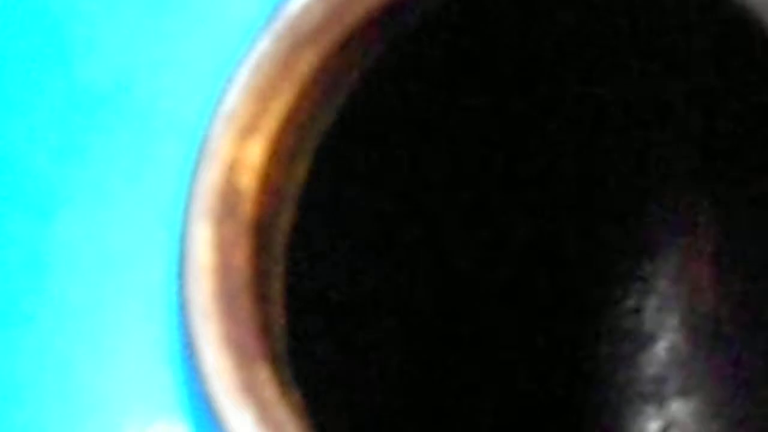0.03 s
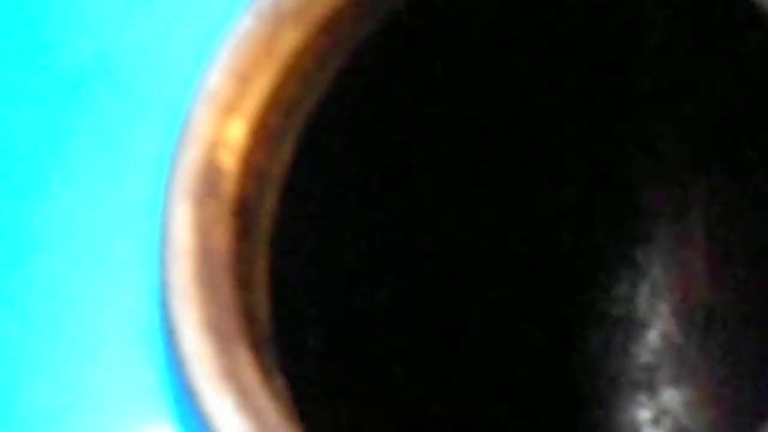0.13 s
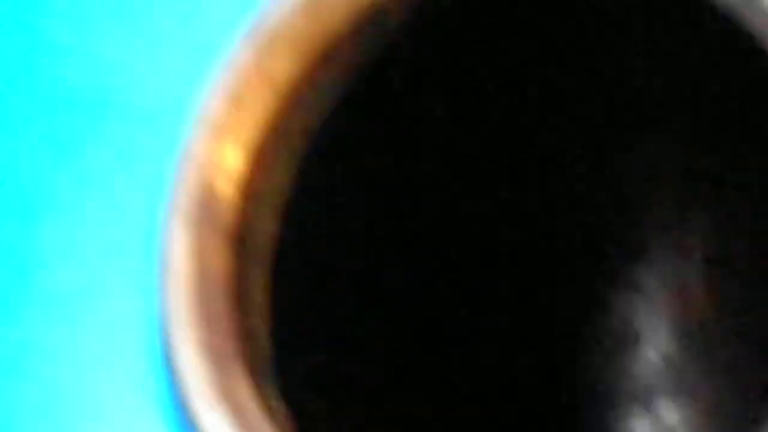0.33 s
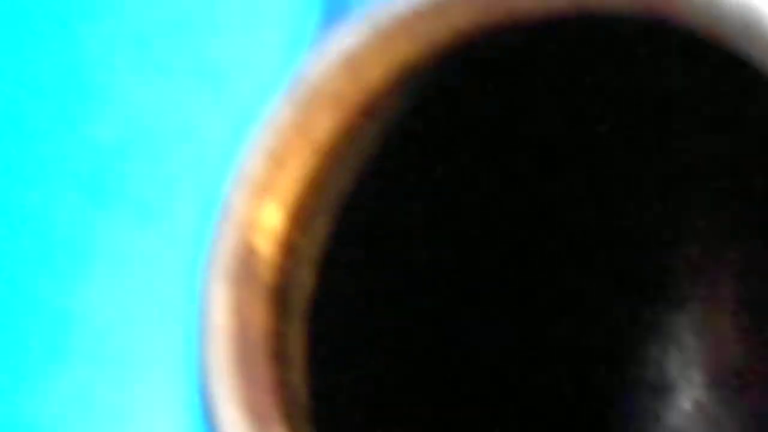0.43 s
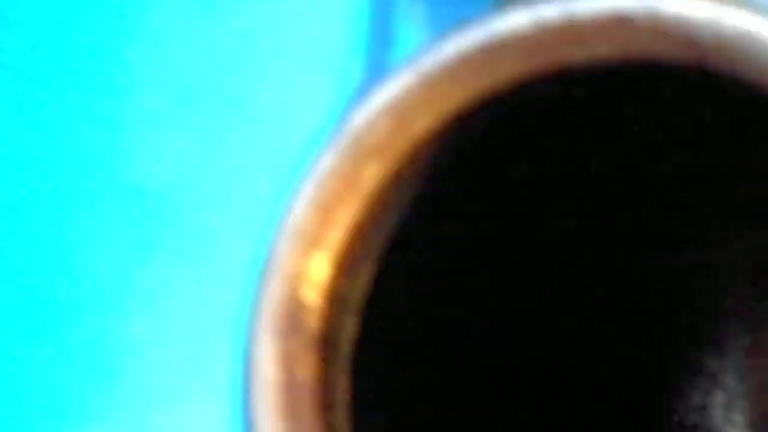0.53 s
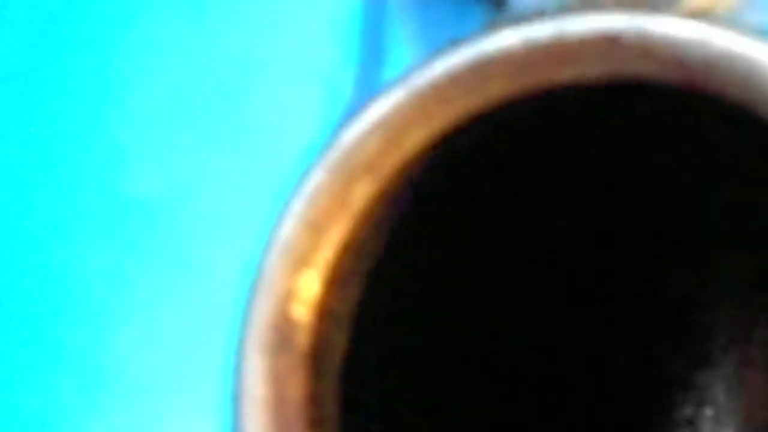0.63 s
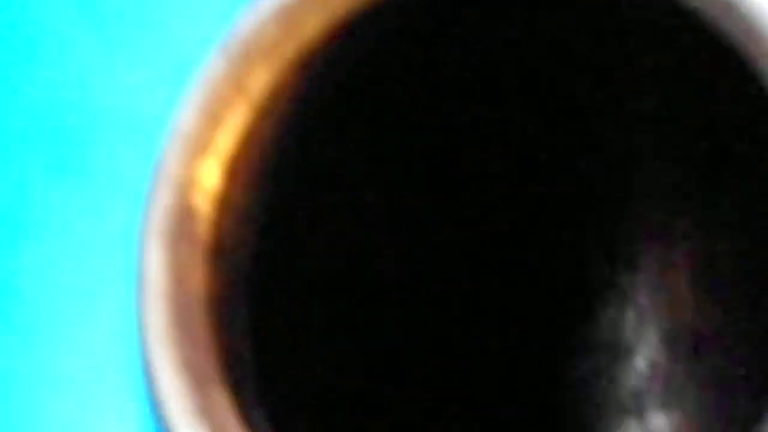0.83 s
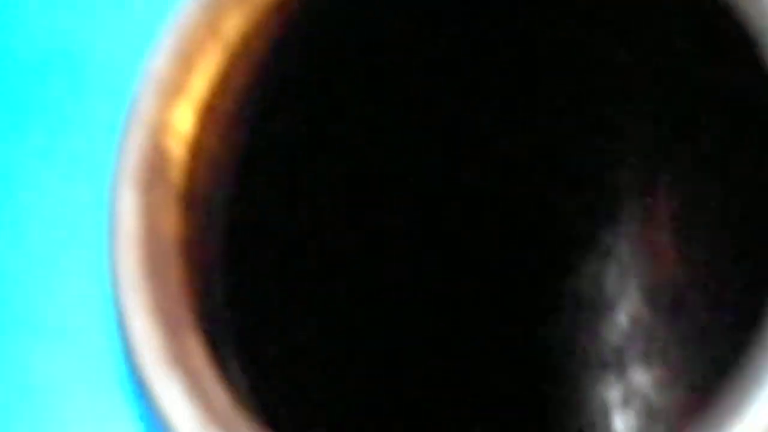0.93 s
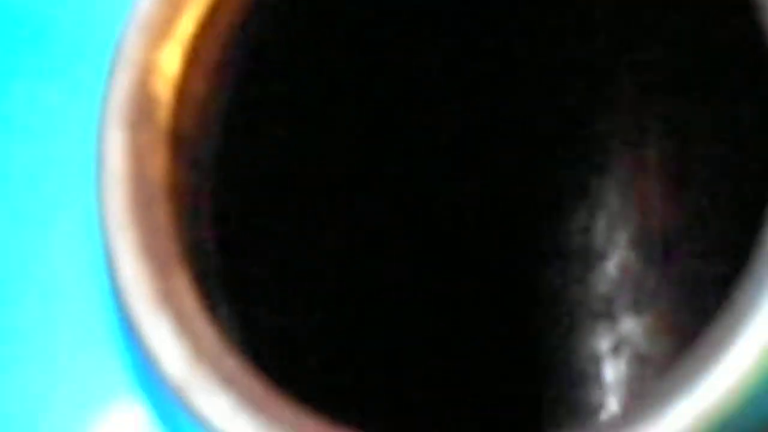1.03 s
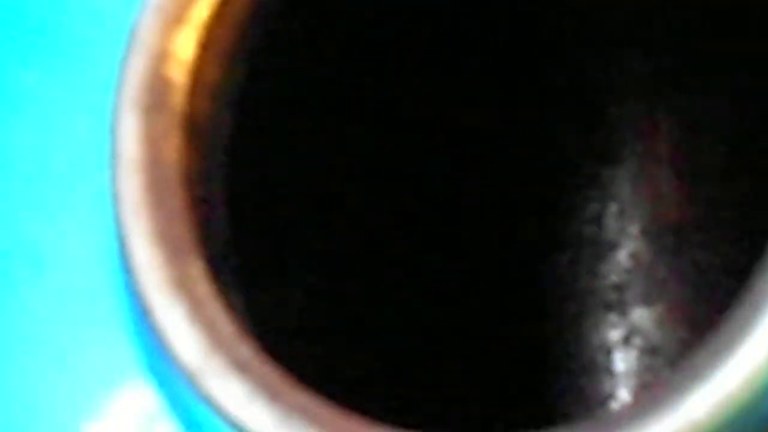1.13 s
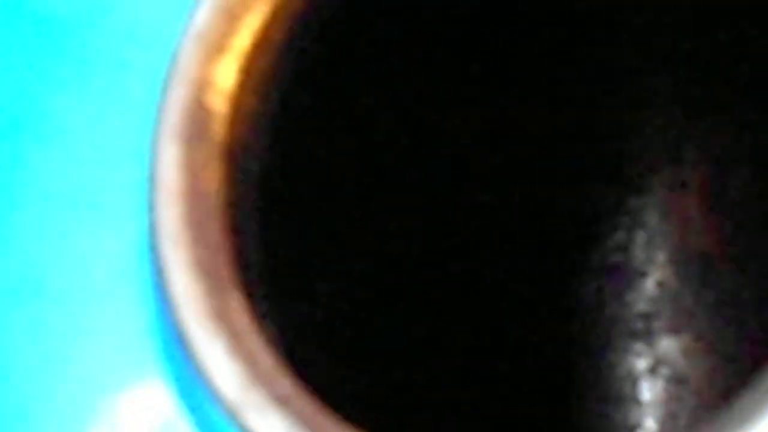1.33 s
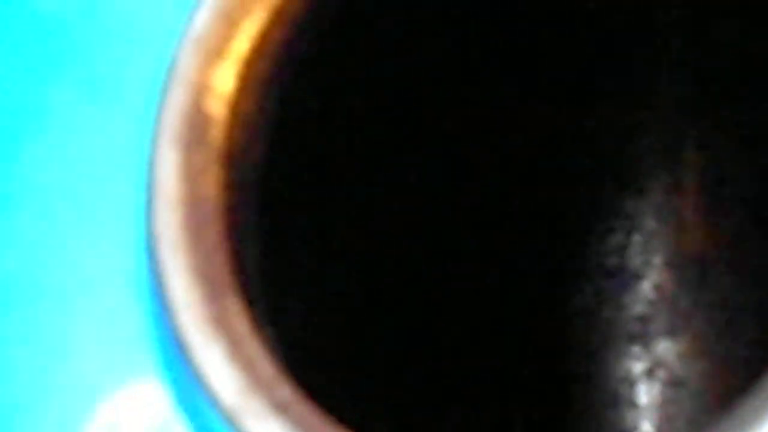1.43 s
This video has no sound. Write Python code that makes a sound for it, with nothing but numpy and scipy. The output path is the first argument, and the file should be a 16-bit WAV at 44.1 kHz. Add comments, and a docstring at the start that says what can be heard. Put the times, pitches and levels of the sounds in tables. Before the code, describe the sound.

A single knock on a metal fuel tank, with light hand scuffs over steady hiss.

```python
"""A quiet place with a steady hiss and a faint hum, where a metal fuel tank is handled close up.
A hand scuffs and slides over the metal while the moving tank rumbles. Then the tank takes one knock:
two hard contacts ring its shell and filler rim, its body thuds, and softer contacts rattle after.
Half a second later a light scrape makes the metal sing faintly."""
import sys
import numpy as np
from scipy.fft import rfft, irfft, next_fast_len
from scipy.io import wavfile
from scipy.ndimage import map_coordinates

SR = 44100
rng = np.random.default_rng(int(sys.argv[2]) if len(sys.argv) > 2 else 0)


def unload_audio(sound):
    """Save the sound as a 16-bit wav file, at the path given as the first command line argument."""
    columns = np.transpose(np.atleast_2d(sound))
    # keep every value between -1 and 1, then stretch to whole-number steps
    steps = np.round(np.clip(columns, -1, 1) * 32767)
    wavfile.write(sys.argv[1], SR, steps.astype(np.int16))


N = 66150
T = np.arange(N) / SR


def amp(db):
    """Decibels to gain."""
    return 10 ** (np.asarray(db) / 20)


def unit(x):
    """Scale to rms 1."""
    return x / np.sqrt(np.mean(x ** 2) + 1e-20)


def eq_gain(curve, hz):
    """Gain of an EQ curve of (freq_hz, gain_db) points on a log frequency axis."""
    freq_hz, gain_db = np.transpose(curve)
    return amp(np.interp(np.log(hz + 1), np.log(freq_hz + 1), gain_db))


def filtered(x, response):
    """Shape the spectrum of x by response(hz)."""
    size = next_fast_len(N + SR // 2)
    return irfft(rfft(x, size) * response(np.fft.rfftfreq(size, 1 / SR)), size)[:N]


def noise(curve):
    """Noise coloured by an EQ curve, at rms 1."""
    return unit(filtered(rng.standard_normal(N), lambda hz: eq_gain(curve, hz)))


def friction(peaks):
    """Friction noise through a bank of resonances, at rms 1."""
    def body(hz):
        return sum(amp(db) * 1j * hz * width / (centre ** 2 - hz ** 2 + 1j * hz * width)
                   for centre, width, db in peaks)
    return unit(filtered(rng.standard_normal(N), body))


def wobble(knots_per_s):
    """A smooth random curve that swings by about 1."""
    knots = rng.standard_normal(int(N * knots_per_s / SR) + 4)
    return map_coordinates(knots, [T * knots_per_s])


def strike(start_s, attack_s, t60_s):
    """Envelope of a blow: a fast rise and an exponential tail."""
    age_s = np.maximum(T - start_s, 0)
    return (1 - np.exp(-age_s / attack_s)) * np.exp(-np.log(1000) * age_s / t60_s)


def swell(peak_s, rise_s, fall_s):
    """A rounded envelope around one peak."""
    return np.exp(-.5 * ((T - peak_s) / np.where(T < peak_s, rise_s, fall_s)) ** 2)


# colour of the air bed: freq_hz, gain_db
AIR_EQ = [(12, -2), (27, -9), (55, -11), (80, -8), (100, -8), (140, -3), (200, -3), (310, 0), (450, -10.5),
          (620, -9.5), (800, -14), (1030, -12), (1200, -18), (1420, -17.5), (1700, -23), (2400, -22.5),
          (4000, -27), (6000, -29.5), (10300, -33), (12000, -42.5)]
# hum and whine lines: pitch_hz, level_db
HUM_LINES = [(184, -41), (260, -48), (620, -50), (1401, -47.5), (7838, -68), (7897, -67.5)]
def background(air_db=-35, waver_db=2, waver_hz=2.02):
    """A bed of steady hiss and low murmuring air, with a few wavering hum and whine lines."""
    hum = np.zeros(N)
    for pitch_hz, level_db in HUM_LINES:
        level = amp(level_db + waver_db * wobble(8.08))
        phase = 2 * np.pi * np.cumsum(pitch_hz + waver_hz * wobble(11.93)) / SR
        hum += level * np.sin(phase)
    return amp(air_db) * noise(AIR_EQ) + hum


# fader ride of the rumble: time_s, level_db
RUMBLE_FADER = [(0, -43.5), (.3, -43.5), (.49, -57), (.535, -24), (.58, -35), (.65, -31), (.71, -47),
                (.78, -35), (.84, -41), (1.1, -45), (1.5, -43)]
# bass-heavy colour of the moving tank: freq_hz, gain_db
RUMBLE_EQ = [(10, -26), (30, 6), (55, -3.5), (85, -7), (130, -14.5), (300, -31), (1000, -66)]
def rumble():
    """The moving tank gives a deep rumble that peaks with the knock and settles after it."""
    level_db = np.interp(T, *np.transpose(RUMBLE_FADER))
    return amp(level_db) * noise(RUMBLE_EQ)


# resonances stirred by the hand: centre_hz, width_hz, gain_db
SCUFF_PEAKS = [(795, 100, -1), (1180, 260, 1), (1560, 92, -11), (2310, 120, -10), (3246, 300, -5)]
def scuff(level_db=-35):
    """One soft, hollow scuff as the hand starts to move."""
    return amp(level_db) * swell(peak_s=0.302, rise_s=0.03, fall_s=0.036) * friction(SCUFF_PEAKS)


# fader ride of the sliding hand: time_s, level_db
SLIDE_FADER = [(0, -59.5), (.23, -48.5), (.29, -47.5), (.38, -41), (.52, -40), (.56, -33), (.605, -39),
               (.64, -43.5), (.76, -47.5), (1.0, -46), (1.15, -48), (1.3, -48.5), (1.5, -58)]
# bright colour of hand on metal: freq_hz, gain_db
SLIDE_EQ = [(400, -15), (1200, -1), (3000, -3.5), (5000, -3), (5800, -8), (8500, -6), (9250, -2.5),
            (9800, -3.5), (10300, -3), (12000, -13)]
def slide(grain_db=1.5, grains_per_s=810):
    """Fine-grained friction of the hand swells towards the knock, then falls away."""
    level_db = np.interp(T, *np.transpose(SLIDE_FADER)) + grain_db * wobble(grains_per_s)
    return amp(level_db) * noise(SLIDE_EQ)


# tiny slips of the metal: peak_s, fall_s, level_db
SLIPS = [(0.564, .003, -44), (0.587, 0.0043, -38), (.595, 0.0057, -35)]
# their narrow treble resonance: centre_hz, width_hz, gain_db
SQUEAK_PEAK = [(9700, 240, 0)]
def squeaks():
    """Thin squeaks as the metal slips during the knock."""
    envelope = sum(amp(db) * swell(peak_s, fall_s / 2, fall_s) for peak_s, fall_s, db in SLIPS)
    return envelope * friction(SQUEAK_PEAK)


# light strokes on the metal: peak_s, rise_s, fall_s, friction_db, pitch_hz, sing_db
SCRAPE_STROKES = [(1.097, 0.0067, 0.015, -38.5, 1830, -42.5), (1.129, 0.0079, .007, -39, 1168, -31),
                  (1.162, 0.014, 0.026, -44, 1168, -43)]
# resonances of the scraped metal: centre_hz, width_hz, gain_db
SCRAPE_PEAKS = [(1190, 58, 2.5), (1810, 83, 3.5), (2020, 70, -3), (2300, 110, -0.5), (3500, 110, -9),
                (4890, 69, -6.5)]
def scrape(wander_hz=11, flutter_db=2):
    """Each brief stroke rasps and sets one mode of the metal singing unsteadily."""
    out = np.zeros(N)
    for peak_s, rise_s, fall_s, friction_db, pitch_hz, sing_db in SCRAPE_STROKES:
        phase = 2 * np.pi * np.cumsum(pitch_hz + wander_hz * wobble(250)) / SR
        tone = amp(sing_db + flutter_db * wobble(200)) * np.sqrt(2) * np.sin(phase)
        rasp = amp(friction_db) * friction(SCRAPE_PEAKS)
        out += swell(peak_s, rise_s, fall_s) * (rasp + tone)
    return out


# rocking of the whole tank (first row) and flexing of its walls: pitch_hz, level_db, t60_s
BODY_MODES = [(26.3, -13.5, 0.27), (145.4, -20, 0.15), (78, -39, 0.054), (116.2, -12, 0.11)]
# entry of each body mode: start_s
BODY_STARTS = [.5455, .5405, .5405, .559]
def thud(attack_s=0.0035):
    """Low, quickly damped swings of the tank put weight under the knock."""
    return sum(amp(db) * strike(start_s, attack_s, t60_s) * np.sin(2 * np.pi * hz * (T - start_s))
               for start_s, (hz, db, t60_s) in zip(BODY_STARTS, BODY_MODES))


def ring(modes, start_s, attack_s, scatter_db, scatter_rad=0.88):
    """Struck modes ring down, their levels and phases a little different on every hit."""
    out = np.zeros(N)
    for pitch_hz, gain_db, t60_s in modes:
        level = amp(gain_db + scatter_db * rng.standard_normal())
        phase = 2 * np.pi * pitch_hz * (T - start_s) + scatter_rad * rng.standard_normal()
        out += level * strike(start_s, attack_s, t60_s) * np.sin(phase)
    return out


# two hard hits, then a rattle: start_s, attack_s, shell_db, cutoff_hz, decay_ratio, rim_db, crack_db
KNOCK_CONTACTS = [(0.541, 0.00017, -26, 3000, 1, -17.5, -19.5),
                  (0.5615, 0.00085, -15, 2580, 0.33, -19.5, -18.5),
                  (0.571, 0.0042, -19.5, 1460, 0.87, -48, -27), (.591, 0.0012, -26, 1500, 0.82, -55, -35),
                  (0.6112, 0.0024, -22, 2100, 0.55, -57, -37), (0.63, .003, -31, 1300, 0.68, -60, -55)]
# clang of the tank's shell: pitch_hz, gain_db, t60_s
SHELL_MODES = [(227.5, -10, 0.052), (277, -7.5, .09), (350, -25, 0.053), (653, -11, 0.046),
               (952, -3, 0.056), (1170, -6, 0.018), (1307, -3.5, 0.13), (1383, -7, 0.2),
               (1575, -1.5, 0.041), (1732, -0.5, 0.057), (1836, -4, .09), (2340, -17, 0.066)]
# dense shell modes blurred into a wash: freq_hz, gain_db
WASH_EQ = [(150, -15), (380, 0), (520, -1.5), (700, 1.5), (1000, -0.5), (1800, -18.5), (2300, -11.5),
           (5000, -19.5), (6000, -23), (12000, -36)]
# ping of the filler rim: pitch_hz, gain_db, t60_s
RIM_MODES = [(3300, -6.5, .025), (4650, -13, .032), (5350, -10, .014), (6300, -4, .007), (7130, -3.5, .023)]
# colour of the contact's crack: freq_hz, gain_db
CRACK_EQ = [(150, -16), (350, -12), (700, 12), (1900, 15), (2500, -9), (3400, -2.5), (6500, 4.5),
            (8000, -2), (12000, 1.5)]
def knock(wash_db=-4, wash_t60_s=0.069, rolloff_power=2.3):
    """Contacts crack and ring the shell, duller when soft, shorter when pressed; hard ones ping the rim."""
    out = np.zeros(N)
    for start_s, attack_s, shell_db, cutoff_hz, decay_ratio, rim_db, crack_db in KNOCK_CONTACTS:
        damped_modes = [(hz, db - 10 * np.log10(1 + (hz / cutoff_hz) ** rolloff_power), t60_s * decay_ratio)
                        for hz, db, t60_s in SHELL_MODES]
        clang = ring(damped_modes, start_s, attack_s, scatter_db=3.5)
        wash = amp(wash_db) * noise(WASH_EQ) * strike(start_s, attack_s, wash_t60_s * decay_ratio)
        ping = ring(RIM_MODES, start_s, attack_s, scatter_db=2)
        crack = noise(CRACK_EQ) * strike(start_s, attack_s, t60_s=.013 + 8 * attack_s)
        out += amp(shell_db) * (clang + wash) + amp(rim_db) * ping + amp(crack_db) * crack
    return out


def scene():
    """All layers mixed in mono at one close microphone."""
    return (background() + scuff() + slide() + squeaks() + knock() + thud() + rumble() + scrape())[None]


# tone of the microphone: freq_hz, gain_db
MIC_EQ = [(20, 0.5), (10350, 0), (10950, -14), (11800, -8.5), (12300, -22)]
def record(dry):
    """The recorder dulls the top of the treble and keeps nothing above its band limit."""
    limit_hz = 12300
    return filtered(dry[0], lambda hz: eq_gain(MIC_EQ, hz) * (hz < limit_hz))[None]


dry = scene()
out = record(dry)
unload_audio(out)
```